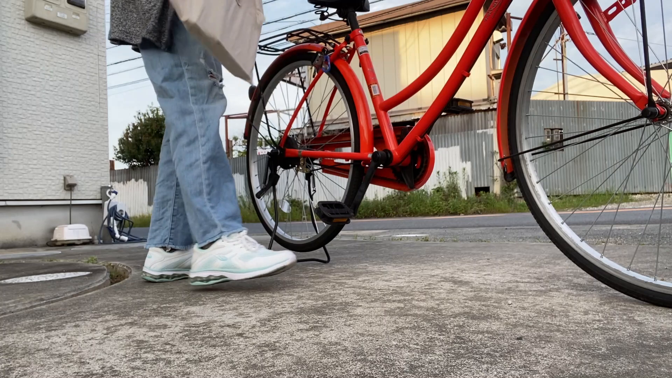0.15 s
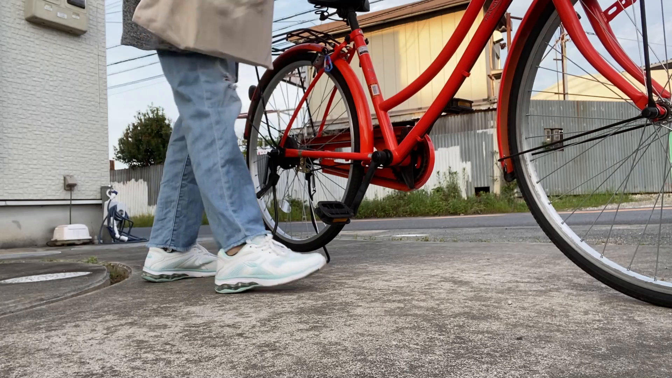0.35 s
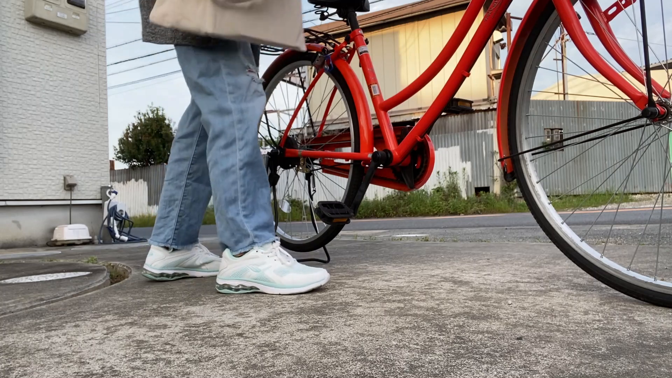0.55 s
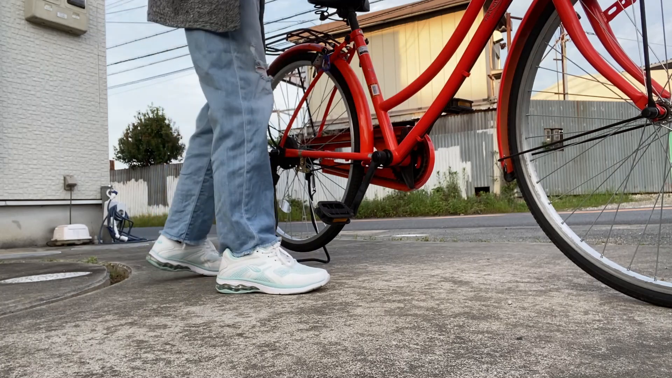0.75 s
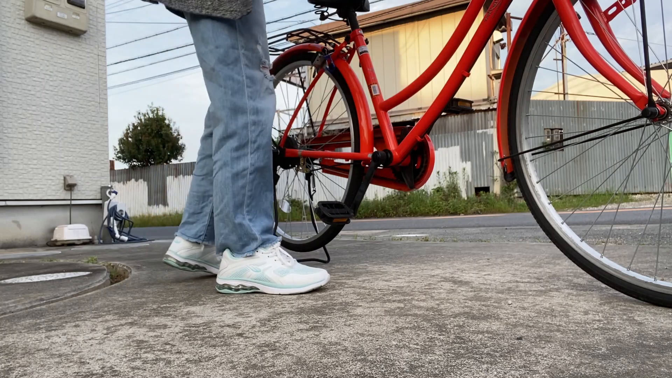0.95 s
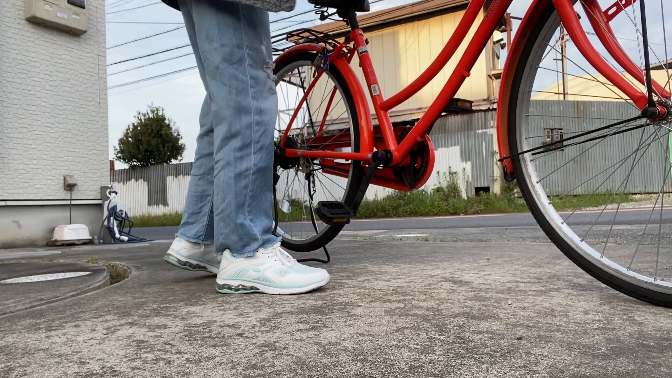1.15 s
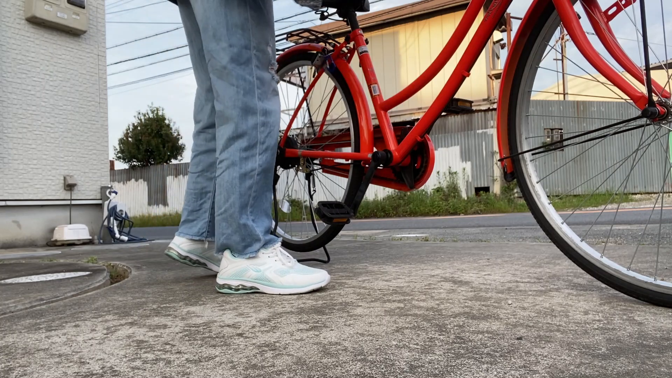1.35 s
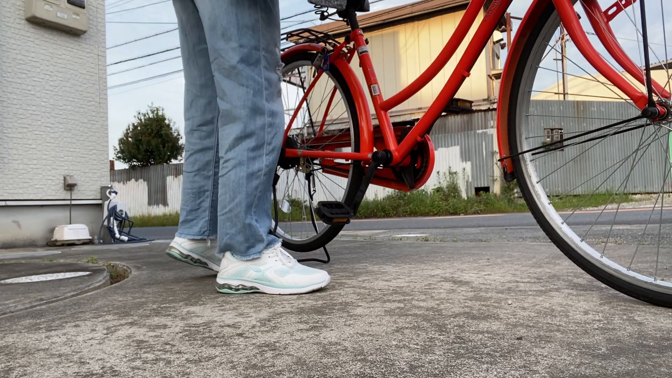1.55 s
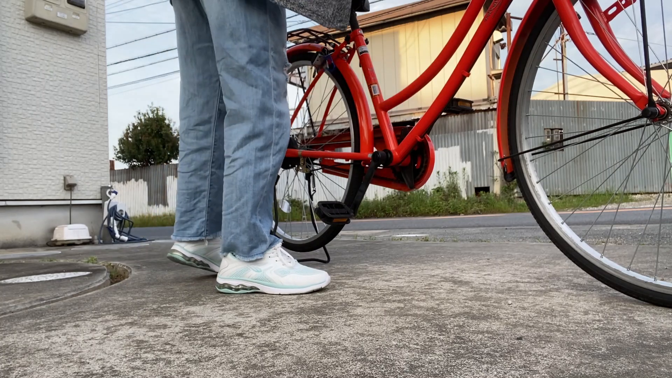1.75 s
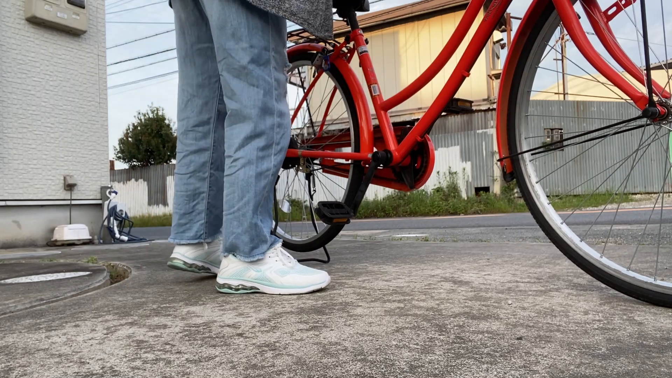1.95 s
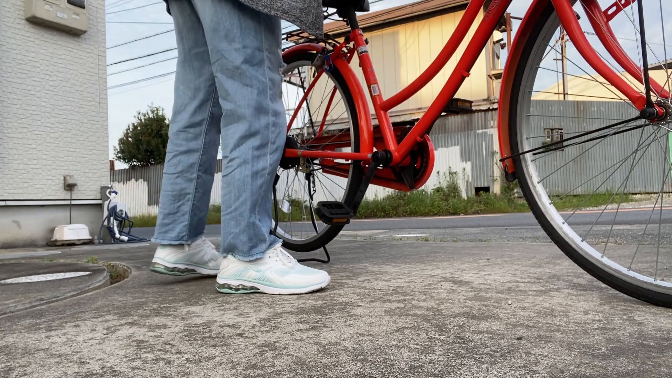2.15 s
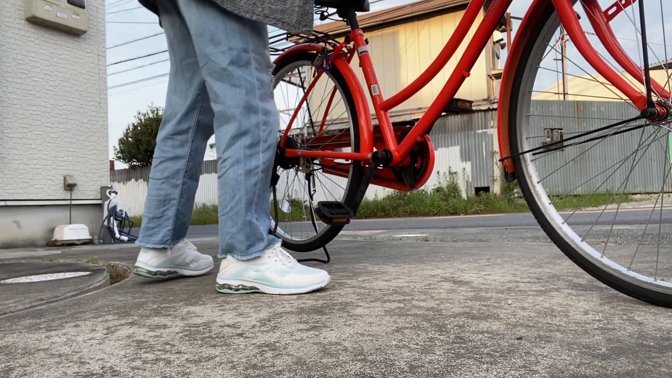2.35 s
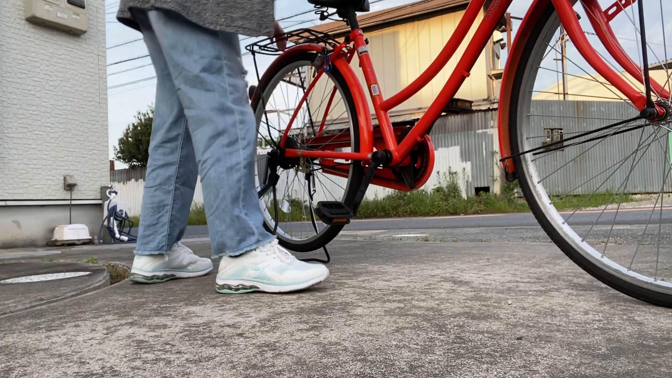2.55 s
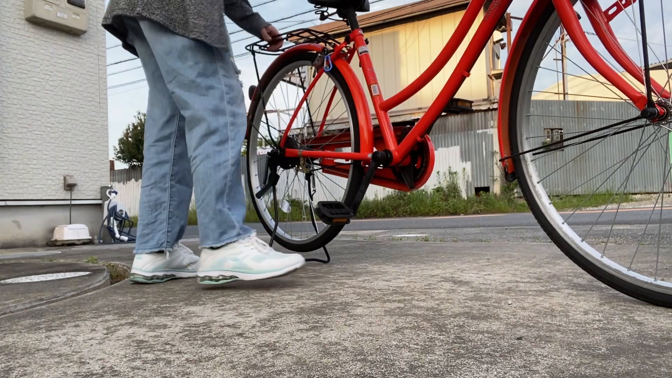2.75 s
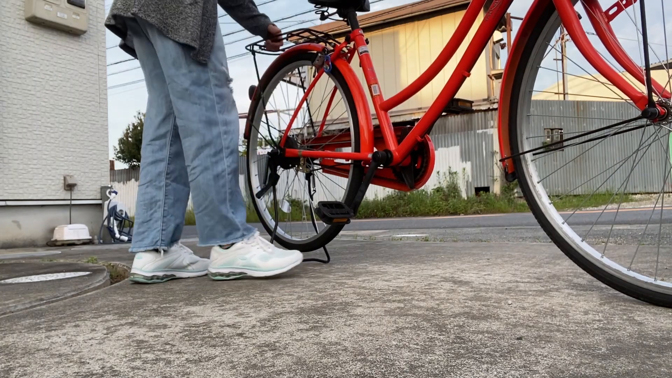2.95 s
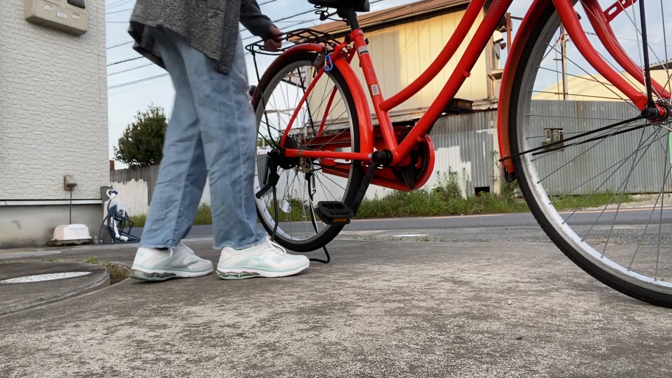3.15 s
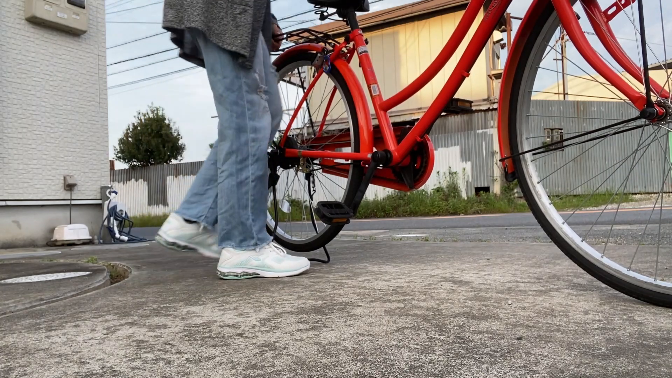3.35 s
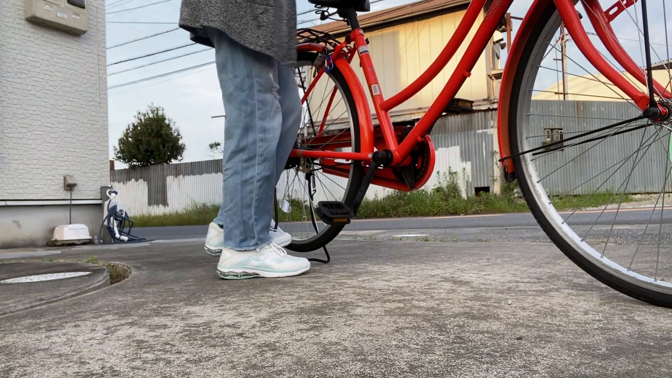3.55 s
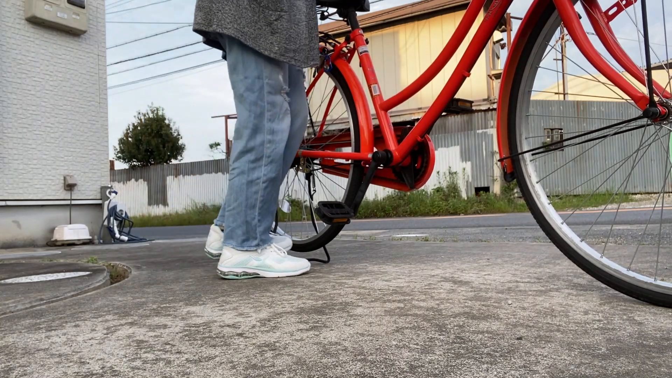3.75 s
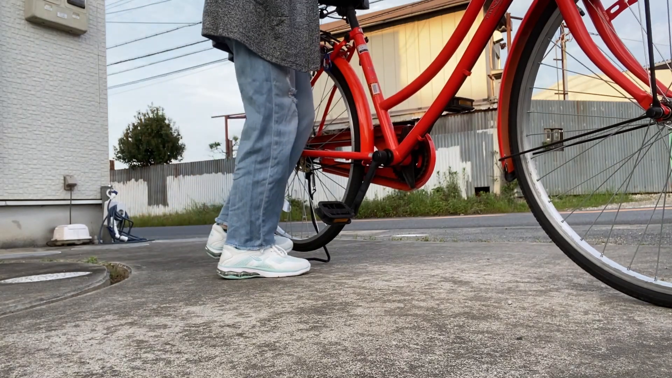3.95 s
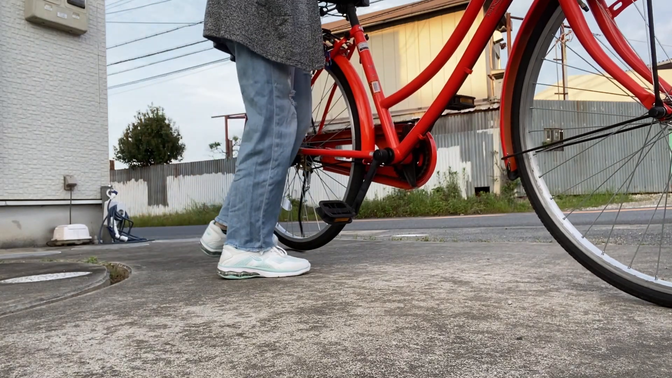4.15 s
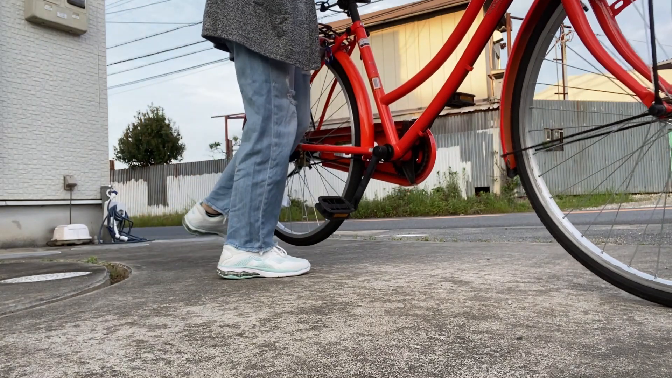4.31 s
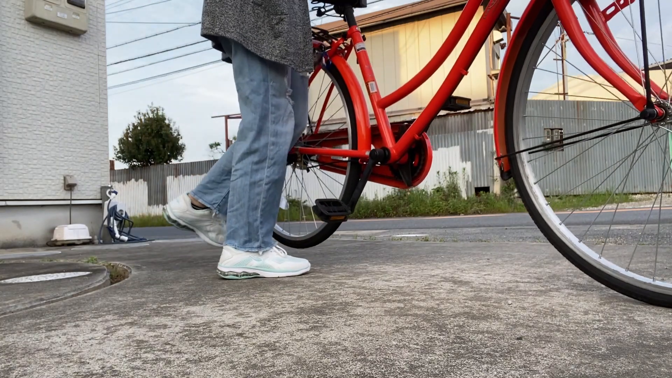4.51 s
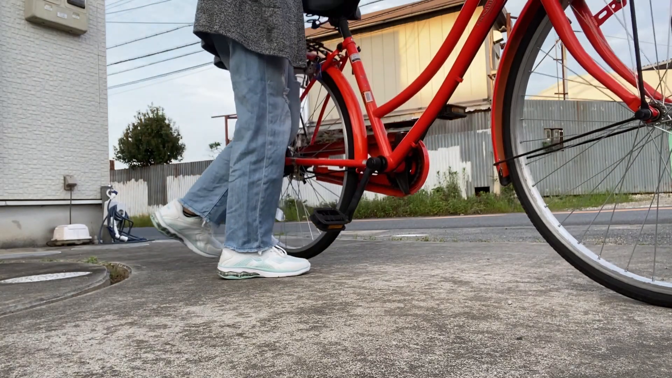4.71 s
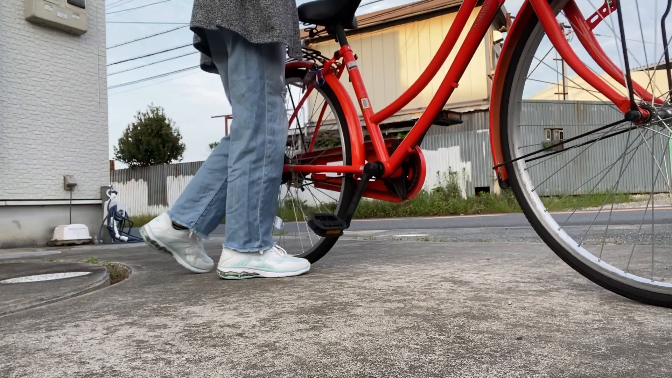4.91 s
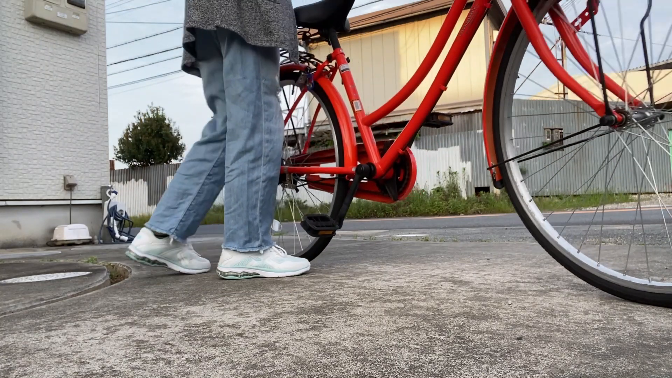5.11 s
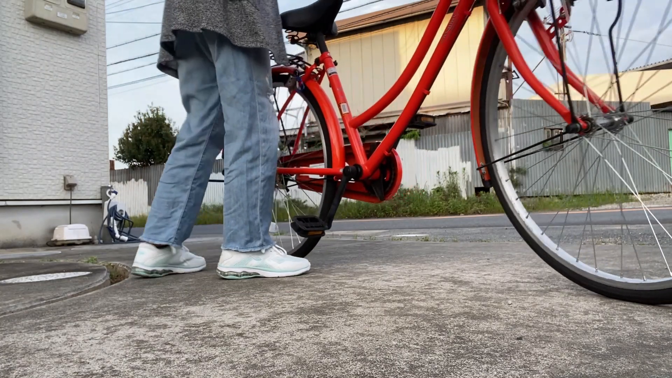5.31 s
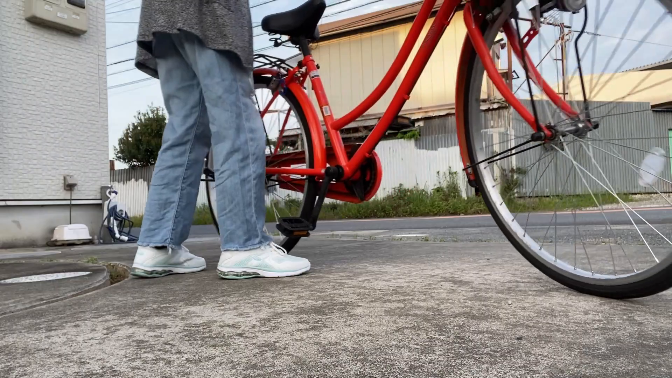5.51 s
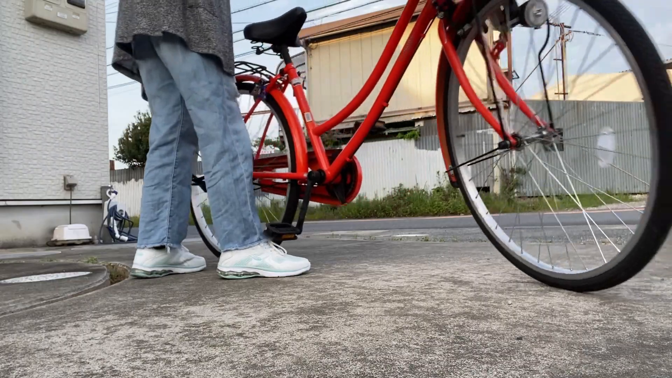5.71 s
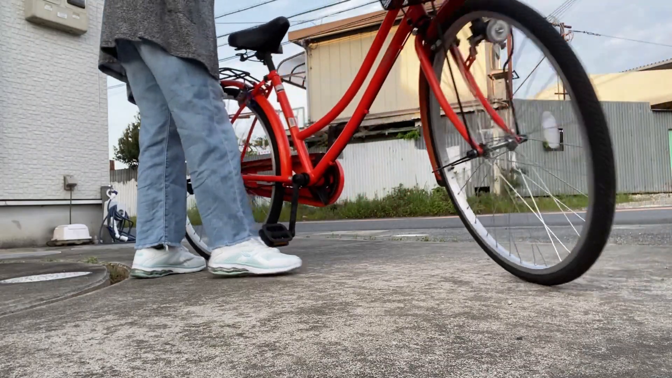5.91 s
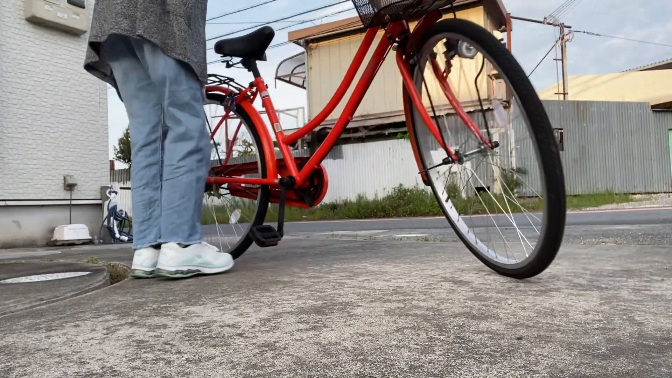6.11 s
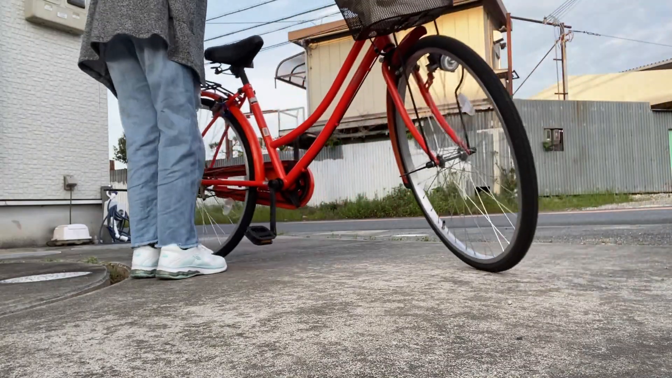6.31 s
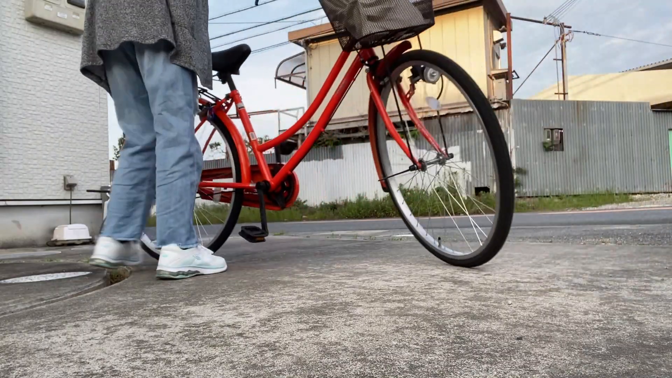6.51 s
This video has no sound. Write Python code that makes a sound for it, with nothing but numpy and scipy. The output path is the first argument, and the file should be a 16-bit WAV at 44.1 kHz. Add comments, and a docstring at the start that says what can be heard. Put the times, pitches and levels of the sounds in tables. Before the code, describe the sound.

Someone steps up to a bicycle in a half-open yard: dull soft-soled footfalls with gritty scuffs, quiet clicks and slight metal shifts. Then the sprung stand springs back, a bright, hard clatter of about six accelerating, fading strikes with loose mudguard and frame rattling. Afterwards come tiny crisp rolling ticks, faint cloth rustle and light scuffing steps. Close stereo microphone, slight wall echo, steady low traffic rumble and hum.

```python
"""Soles scuff grit on concrete, then a bicycle's sprung stand snaps up and clatters, ever faster and weaker.
Someone has stepped up to it on a driveway and pushes it off its two-legged stand; it ticks as it rolls.
Random tiny collisions excite filters and ringing modes for stand, mudguard, carrier, frame and spring.
Shaped noise makes footfalls, ticks and traffic; unsteady sines make the low outdoor hum."""
import sys
import numpy as np
from scipy import signal
from scipy.fft import rfft, irfft, next_fast_len
from scipy.io import wavfile

SR = 44100
rng = np.random.default_rng(int(sys.argv[2]) if len(sys.argv) > 2 else 0)


def output_pcm(signal):
    """Save a mono or channel-first signal as 16-bit PCM at the path in sys.argv[1].

    Samples are clipped to [-1, 1] before scaling.
    """
    pcm = np.clip(np.atleast_2d(signal).T, -1, 1) * 32767
    wavfile.write(sys.argv[1], SR, np.round(pcm).astype(np.int16))


N = 289638
TIME = np.arange(N) / SR

# the stand hits its stop and bounces, ever sooner and weaker: (time [s], level [dB])
BOUNCES = [(4.3334, -13), (4.4747, -15.5), (4.5934, -18.7), (4.6904, -23), (4.762, -27.5), (4.808, -39)]
# bright spectrum shared by ticks and rustling cloth: (frequency [Hz], density [dB per Hz])
TICK_SPECTRUM = [(500, -36), (2500, -7), (5000, 4), (7500, 3), (10500, 5.5), (16000, -6)]
# the spring drags the stand up before the first hit
SWING_START_S, SWING_RISE_S = 4.306, .02
STRIKE_RISE_S = .0032


def from_db(db):
    """Decibels to gain."""
    return 10 ** (np.asarray(db) / 20)


def rms_one(x):
    """Scale to unit power."""
    return x / np.sqrt(np.mean(np.abs(x) ** 2) + 1e-20)


def at_hz(points, hz):
    """Read a table on a log-frequency axis."""
    known, values = np.transpose(points)
    return np.interp(np.log(np.maximum(hz, 1)), np.log(known), values)


def colour(x, spectrum, size=8192):
    """Causal (minimum-phase) filter with the given spectrum, passing white noise at unchanged power."""
    gain = from_db(at_hz(spectrum, np.linspace(0, SR / 2, size // 2 + 1)))
    cepstrum = irfft(np.log(gain))
    # doubling the causal half of the cepstrum gives minimum phase
    response = irfft(np.exp(rfft(2 * cepstrum[:size // 2], size)))
    response = response / np.linalg.norm(response)
    return signal.oaconvolve(x, response[None], axes=1)[:, :x.shape[1]]


def drift(rate, size=2000):
    """Slow random wander of unit rms: noise through a double one-pole lowpass at rate [Hz]."""
    r = np.exp(-2 * np.pi * rate * TIME[-1] / size)
    noise = rng.standard_normal(2 * size)
    slow = signal.lfilter([1], [1, -2 * r, r * r], noise)[size:]
    return np.interp(TIME, np.linspace(0, TIME[-1], size), rms_one(slow))


def contacts(per_s, spread_db):
    """Random tiny collisions of uneven size, two unrelated streams of unit power."""
    unevenness = np.clip(rng.standard_normal((2, N)), -2, 2)
    sizes = from_db(spread_db * unevenness) * rng.choice([-1, 1], (2, N))
    return rms_one(sizes * (rng.random((2, N)) < per_s / SR))


def surges(starts, level_db, rise_s, t60_s, hold_s=0):
    """Envelope of bursts that each swell, hold, then die away; overlapping bursts add in power."""
    power = np.zeros(N)
    for start, db, hold in np.broadcast(starts, level_db, hold_s):
        span = slice(int(start * SR), int(start * SR) + SR)
        age = TIME[span] - TIME[span][0]
        fall = np.exp(-np.log(1000) * np.maximum(age - rise_s - hold, 0) / t60_s)
        power[span] += (from_db(db) * np.minimum(age / rise_s, 1) * fall) ** 2
    return np.sqrt(power)


def ring(x, hz, width_hz):
    """One two-pole resonant mode, passing white noise at unit power."""
    r, w = np.exp(-np.pi * width_hz / SR), 2 * np.pi * hz / SR
    drive = [0, np.sin(w) * np.sqrt(2 * (1 - r * r))]
    return signal.lfilter(drive, [1, -2 * r * np.cos(w), r * r], x + 1e-18)


def pan(db):
    """Gains of the two sides for a left-right difference."""
    return from_db(db * np.array([[1], [-1]]) / 2)


def at_ports(pair, sides):
    """Two unrelated signals reach the microphone pair with its likeness and a left-right balance."""
    # the port spacing swings the treble in and out of phase: (frequency [Hz], left-right likeness [-1 to 1])
    likeness = [(60, 0.97), (120, 0.96), (220, 0.82), (380, -0.087), (650, -0.67), (1100, -0.065),
                (1600, -0.11), (2800, 0.13), (6000, -0.11), (8000, 0.79), (9200, 0.094), (10100, -1),
                (10900, -1), (12600, 0.78), (13400, 0.9), (15100, -1)]
    size = next_fast_len(N + SR // 10)
    mid, side = rfft(pair, size)
    hz = np.linspace(0, SR / 2, len(mid))
    alike = np.clip(at_hz(likeness, hz), -.995, .995)
    common = np.sqrt((1 + alike) / 2) * mid
    opposed = np.sqrt((1 - alike) / 2) * side * [[1], [-1]]
    return irfft((common + opposed) * pan(at_hz(sides, hz)), size)[:, :N]


def outdoors(wander_db=0.55):
    """Distant traffic, as shaped noise, swells slowly; clothes rustle as the legs swing."""
    # low, soft-topped traffic spectrum: (frequency [Hz], density [dB per Hz])
    air_spectrum = [(22, -33.5), (40, -13), (60, -2), (85, 0.5), (135, -2.5), (175, 0.5), (250, -7),
                    (350, -9.5), (600, -16), (1200, -20), (2600, -26.5), (5000, -37), (8500, -46.5),
                    (15000, -56)]
    # traffic swell before its random wander: (time [s], level [dB])
    traffic = [(0, -45.5), (1.3, -45.5), (3.2, -44), (4.8, -44.5), (5.7, -46), (6.57, -45.5)]
    # trouser legs swish past each other: (middle time [s], level [dB])
    swishes = [(.6, -69), (1.8, -66), (5.15, -65), (5.85, -72)]
    swish_half_s = .14  # from the peak to half amplitude

    # one spare second lets the filter settle
    air = colour(rng.standard_normal((2, N + SR)), air_spectrum)[:, SR:]
    air = air * from_db(np.interp(TIME, *np.transpose(traffic)) + wander_db * drift(4))
    swing = sum(from_db(db) / (1 + ((TIME - s) / swish_half_s) ** 2) for s, db in swishes)
    rustle = colour(contacts(per_s=8000, spread_db=7), TICK_SPECTRUM) * swing
    return air + rustle


def hum(waver_db=1.74):
    """Far machinery hums: sines whose pitch and level waver a little."""
    # machine tones: (centre frequency [Hz], typical rms level [dB], width of the pitch wander [Hz])
    machine_tones = [(60.4, -50, 2), (166, -58.5, 11), (305, -62, 1.93), (821, -74.5, 5.4),
                     (1080, -80.5, 3.7), (1195, -73.5, 9)]
    total = 0
    for hz, db, width in machine_tones:
        level = from_db(db + waver_db * drift(2.5))
        phase = 2 * np.pi * np.cumsum(hz + width / 2 * drift(4)) / SR
        total = total + level * np.sqrt(2) * np.sin(phase)
    return total


def shoes(crunch_db=1.5, crunch_per_s=45, knock_db=-9, knock_rise_s=.001, knock_t60=.025, rubber_cut_hz=2200):
    """The heel's edge knocks, then heel and sole thud and crush grit on the concrete."""
    # footfalls: (time [s], thud level [dB], grit level [dB], length of the sole's scuff [s])
    steps = [(0.446, -36.5, -45.5, .002), (1.8436, -33, -49, 0.031), (2.335, -60, -57, .001),
             (2.646, -45, -55, .001), (2.713, -44, -60, .001), (5.915, -45.5, -42.3, 0.082),
             (6.2233, -39.5, -45.5, 0.0057)]
    # weight on concrete: (frequency [Hz], density [dB per Hz])
    thud_spectrum = [(30, -22), (70, 1.5), (130, 1.5), (220, 2.5), (400, -2), (600, -14), (1300, -17.5),
                     (3000, -38), (12000, -48)]
    # crushed grit: (frequency [Hz], density [dB per Hz])
    grit_spectrum = [(150, -12), (600, 0.5), (1000, 2), (1300, 0.5), (1700, 4), (2200, -0.5), (3500, -3.5),
                     (7000, -5.5), (10500, -12), (16000, -12)]
    s, thud_db, grit_db, scuff_s = np.transpose(steps)

    def heel_and_sole(db, heel_db):
        """The heel lands first, then the sole rolls down and scuffs."""
        heel = surges(s, db + heel_db, rise_s=.002, t60_s=.12)
        sole = surges(s + .02, db, rise_s=.009, t60_s=.1, hold_s=scuff_s)
        return np.hypot(heel, sole)

    weight = heel_and_sole(thud_db, heel_db=-1)
    crush = heel_and_sole(grit_db, heel_db=0)
    thud = colour(rng.standard_normal((2, N)) * weight, thud_spectrum)
    crunch = from_db(crunch_db * drift(crunch_per_s))
    grit = contacts(per_s=1300, spread_db=4.5) * crush * crunch
    knock = rng.standard_normal((2, N)) * surges(s, thud_db + knock_db, knock_rise_s, knock_t60)
    # soft rubber keeps the knock dull
    knock = signal.lfilter(*signal.butter(2, rubber_cut_hz, fs=SR), knock)
    return thud + colour(grit + knock, grit_spectrum)


def ticks(snap_db=-3, snap_rise_s=.00056, snap_t60=0.0065, tail_db=-18, tail_t60=.06, count=7):
    """Tiny hard snaps of noise, each with a faint scatter after it."""
    # the clearest ticks of freewheel and grit, before snap_db and tail_db: (time [s], level [dB])
    clear_ticks = [(2.1051, -50.5), (2.7166, -51), (3.6486, -42), (4.0342, -42), (4.2885, -45.5),
                   (4.9945, -39), (5.1, -40), (5.1213, -28.5), (5.309, -42), (5.5736, -41), (5.8735, -42),
                   (5.917, -36), (5.9956, -31), (6.0124, -33), (6.2362, -46)]
    # fainter ticks come at random once the bicycle rolls
    faint_s = rng.uniform(5.1, 5.65, count)
    faint_db = rng.normal(-50, 2, count)
    s, db = np.vstack([clear_ticks, np.column_stack([faint_s, faint_db])]).T
    snap = surges(s, db + snap_db, snap_rise_s, snap_t60)
    scatter = surges(s, db + tail_db, .002, tail_t60)
    return colour(rng.standard_normal((2, N)) * (snap + scatter), TICK_SPECTRUM)


def bicycle(clash_db=-4, ring_db=-17, frame_db=-4, treble_hz=4000, vary_db=2, vary_per_s=6):
    """Bounces strike the stop, rattle loose steel and shake the frame; the hand stirs the same parts softly."""
    # creaks and shifts under the hand: (time [s], chatter level [dB], frame shake level [dB])
    shifts = [(3.644, -49, -57), (4.01, -49, -52), (4.034, -45.5, -33.5), (4.165, -58.5, -62)]
    # ringing of stand, mudguard and frame: (frequency [Hz], width [Hz], level [dB])
    bike_modes = [(309, 8, -.5), (335, 11, -2.5), (446, 7, -9.5), (801, 11, -7.5), (920, 16, -5.5),
                  (1099, 13, -1.5), (1221, 22, 2.5), (1393, 12, -5.5), (1526, 14, -2.5), (1958, 13, -3.5),
                  (2083, 26, 2.5), (2173, 19, -.5), (2324, 16, -1.5), (2511, 16, -3.5), (2651, 30, .5),
                  (3048, 34, -.5), (3290, 18, -1.5), (3470, 18, -7.5), (3735, 20, -.5), (4758, 17, -5.5),
                  (5007, 40, .5), (5236, 30, -6.5), (5554, 26, -3.5), (5819, 17, -5.5), (6203, 32, -6.5),
                  (6798, 65, 1.5), (7105, 24, -6.5), (7409, 26, -7.5), (8108, 24, -8.5), (8828, 19, -10.5)]
    # dense clash of steel: (frequency [Hz], density [dB per Hz])
    clash_spectrum = [(200, -45.5), (620, -18), (880, -11.5), (1680, -6.5), (2060, -1.5), (2850, -2.5),
                      (4200, -6.5), (5100, -2), (6900, -10.5), (7800, -13.5), (9000, -13.5), (10500, -19),
                      (13000, -18), (16000, -24.5)]
    # shaken frame: (frequency [Hz], density [dB per Hz])
    frame_spectrum = [(22, -46.5), (50, -8), (130, -10), (210, -7.5), (310, 0), (400, -3), (550, -13.5),
                      (820, -2.5), (1230, -2.5), (1700, -11.5), (2600, -8), (5000, -25.5), (12000, -30)]
    s, db = np.transpose(BOUNCES)
    shift_s, shift_db, shift_shake_db = np.transpose(shifts)

    # every bounce is a short, bright strike of steel on steel
    strike = surges(s, db, STRIKE_RISE_S, t60_s=.075, hold_s=.002)
    # before the first hit the rising stand grates in its pivot
    swing = surges(SWING_START_S, -26, SWING_RISE_S, t60_s=.12)
    hard = np.hypot(strike, swing)
    # loose mudguard and carrier answer a little later with a duller rattle
    rattle = surges(s + .016, db - 7, rise_s=.003, t60_s=.14)
    stirred = surges(shift_s, shift_db, rise_s=.008, t60_s=.17)
    loose = np.hypot(rattle, stirred)
    # the heavy frame takes the shake up slowly and holds it longest
    shake_rise_s, shake_t60_s = .017, .28
    shaken = surges(s + .007, db - 6, shake_rise_s, shake_t60_s)
    nudged = surges(shift_s, shift_shake_db, shake_rise_s, shake_t60_s)
    heavy = np.hypot(shaken, nudged)

    strength = np.hypot(hard, loose)
    chatter = contacts(per_s=6500, spread_db=3.0)
    # harder contact adds treble
    extra = chatter * hard * (from_db(6.5) - 1)
    extra = signal.lfilter(*signal.butter(1, treble_hz, "high", fs=SR), extra)
    clash = colour(chatter * strength + extra, clash_spectrum)

    # left and right legs and stays are near twins, so the modes come in close pairs
    twins = [(side, contacts(per_s=6200, spread_db=2) * strength) for side in (-1, 1)]
    split = .002  # each twin's detuning, as a share of the mode's frequency
    rings = 0
    for hz, width, level in bike_modes:
        # the points of contact shift, so every blow favours other modes
        share = from_db(level + vary_db * drift(vary_per_s))
        for side, force in twins:
            rings = rings + ring(force * share, hz * (1 + side * split), width)
    shake = colour(contacts(per_s=5000, spread_db=2.5) * heavy, frame_spectrum)
    return from_db(clash_db) * clash + from_db(ring_db) * rings + from_db(frame_db) * shake


def spring():
    """The coil grates on its hooks during the swing and gives a short, rough twang as it snaps home."""
    # ringing of the coil: (frequency [Hz], width [Hz], level [dB])
    spring_modes = [(2195, 140, -0.5), (2580, 200, -3.5)]
    stretch = surges(SWING_START_S, -26.5, SWING_RISE_S, t60_s=.28)
    # it snaps home on the first hit
    snap = surges(BOUNCES[0][0], -12.5, STRIKE_RISE_S, t60_s=.07)
    force = contacts(per_s=9000, spread_db=0.5) * np.hypot(stretch, snap)
    return sum(from_db(db) * ring(force, hz, width) for hz, width, db in spring_modes)


def yard(x, first_echo_s=0.008, wall_cut_hz=4500, t60_s=.65):
    """Scattered echoes from house walls and fences, as decaying noise, dulled on the way."""
    age = TIME[:SR]
    fall = np.exp(-np.log(1000) * age / t60_s)
    echoes = rng.standard_normal((2, SR)) * (age > first_echo_s) * fall
    echoes = signal.lfilter(*signal.butter(1, wall_cut_hz, fs=SR), echoes)
    return signal.oaconvolve(x, echoes / np.linalg.norm(echoes[0]), axes=1)[:, :N]


def scene():
    """Bicycle and shoes close by in a half-open yard, with traffic, cloth and hum around them."""
    # where the bicycle's parts are heard: (frequency [Hz], left-right difference [dB])
    bike_side = [(100, -1), (380, -4.5), (780, 8), (1150, -2.5), (1500, -5.5), (1900, 0), (3600, -1.5),
                 (4400, -0.5), (8000, 0.5)]
    # where the street is heard: (frequency [Hz], left-right difference [dB])
    street_side = [(60, 0), (350, -4), (700, 3.5), (1500, 1), (2400, 0)]
    near = bicycle() + spring() + shoes() + ticks()
    close_by = at_ports(near + from_db(-18.0) * yard(near), bike_side)
    street = at_ports(outdoors(), street_side)
    return close_by + street + pan(-1.2) * hum()


def record(dry):
    """A steep elliptic lowpass cuts the top."""
    cutoff_hz = 15800
    steep = signal.ellip(10, .2, 80, cutoff_hz, fs=SR, output="sos")
    return signal.sosfilt(steep, dry)


dry = scene()
out = record(dry)
output_pcm(out)
```